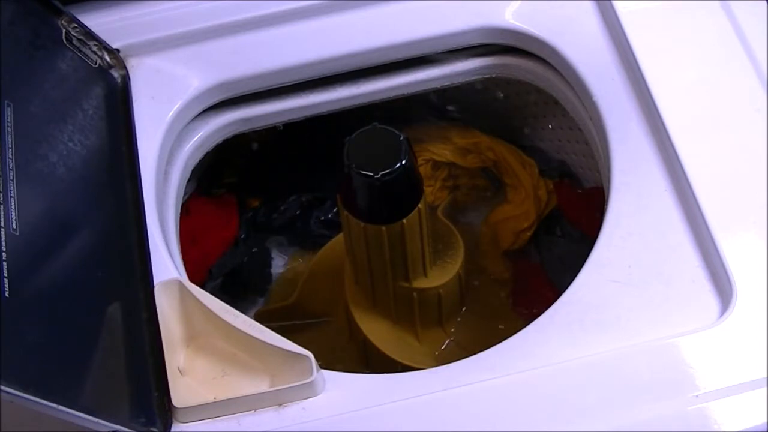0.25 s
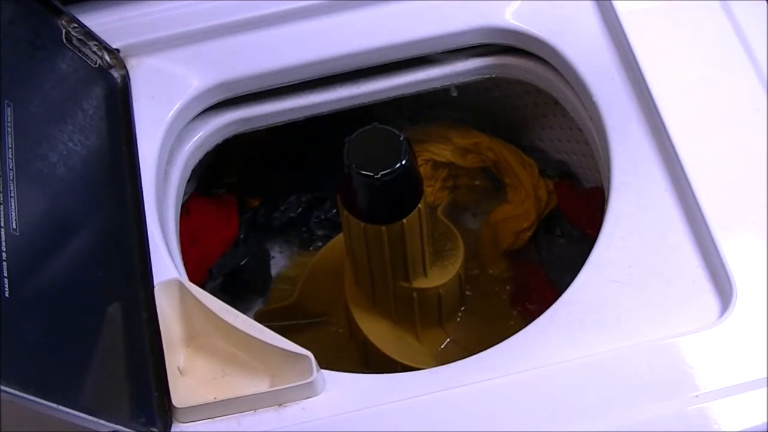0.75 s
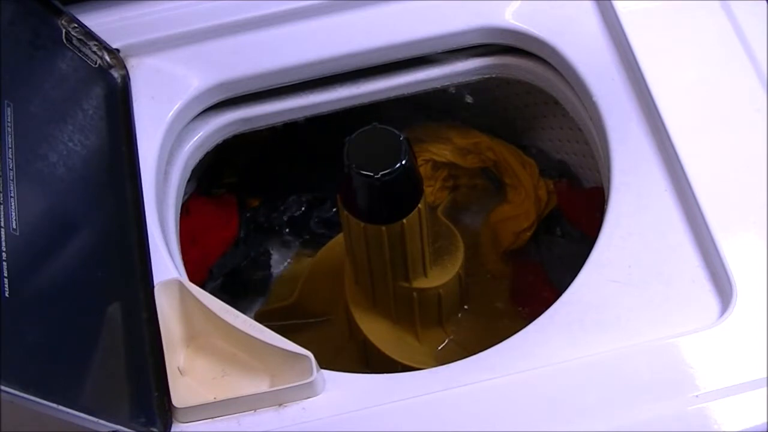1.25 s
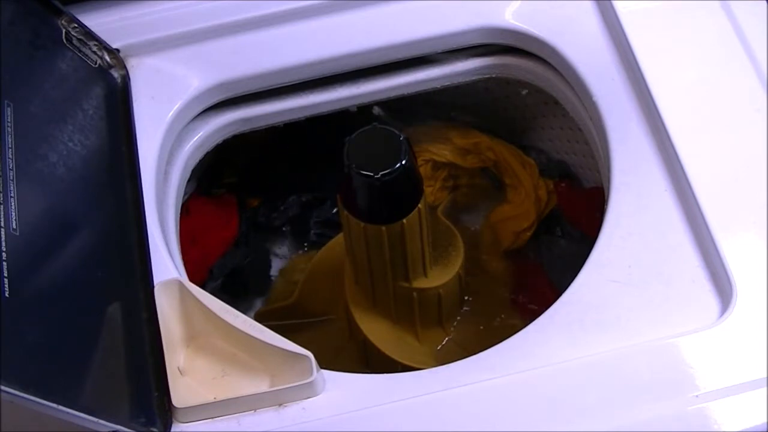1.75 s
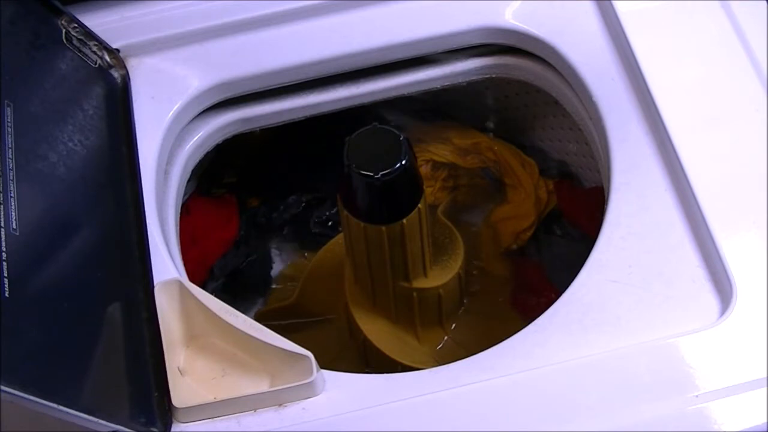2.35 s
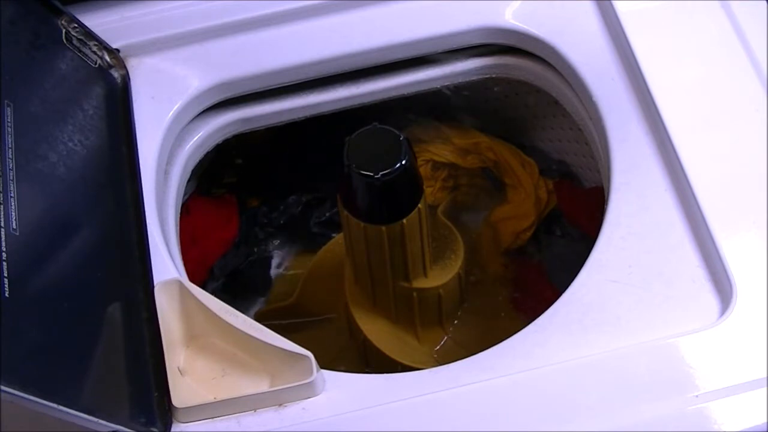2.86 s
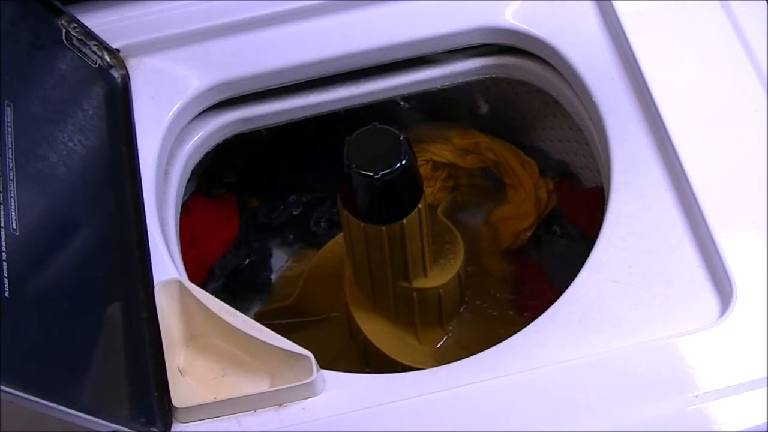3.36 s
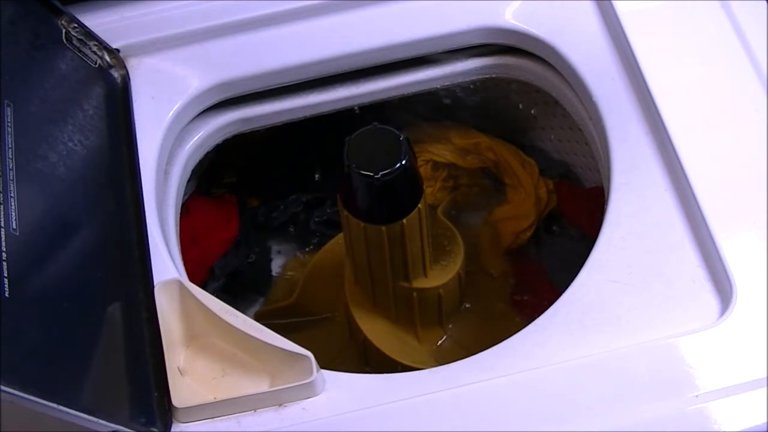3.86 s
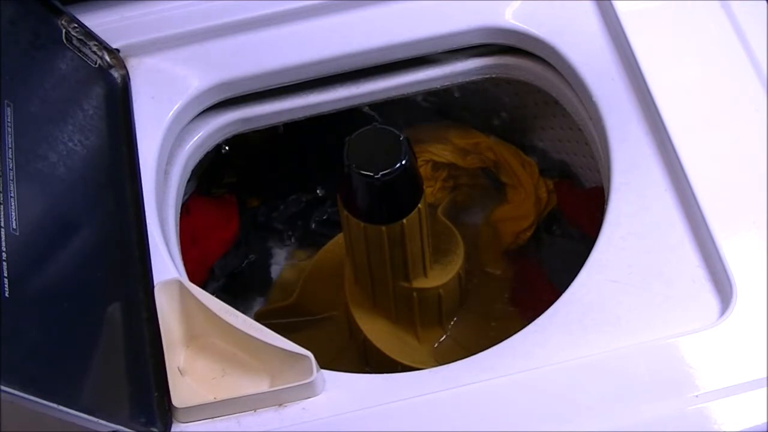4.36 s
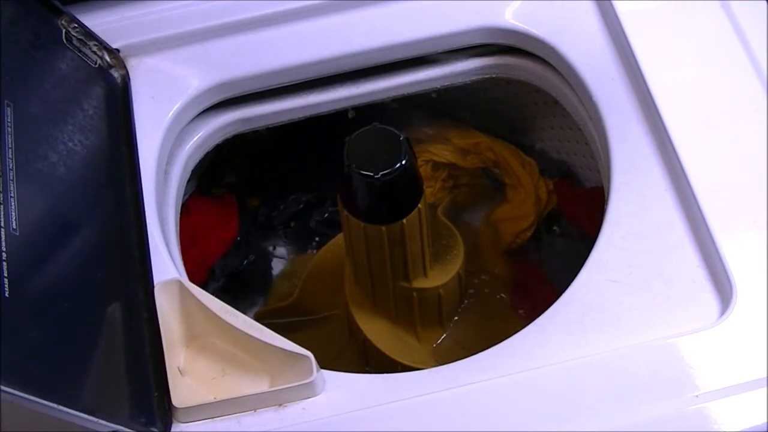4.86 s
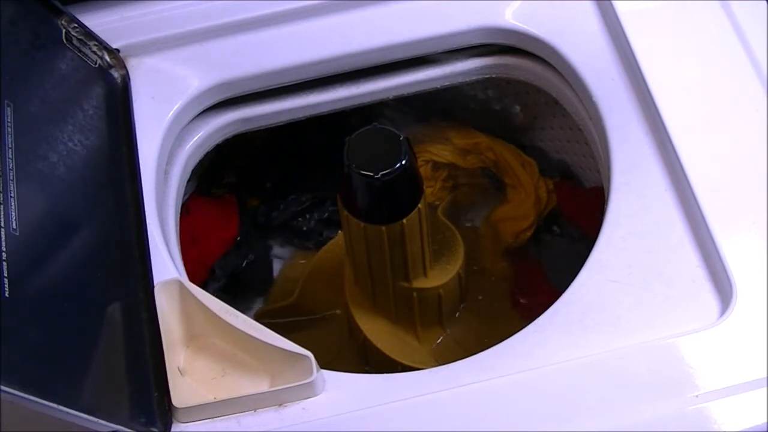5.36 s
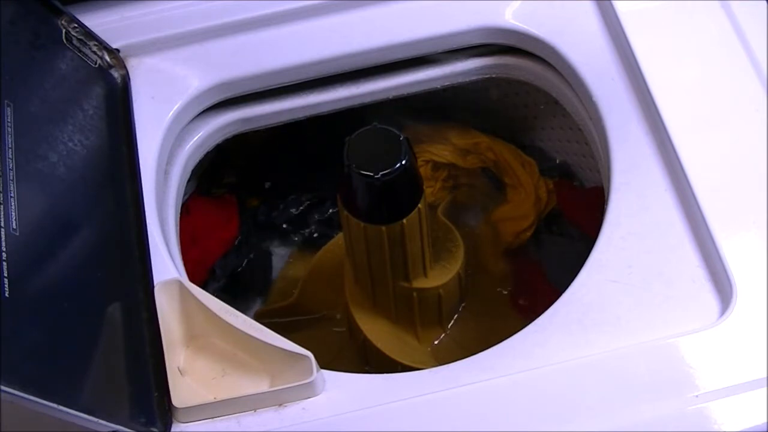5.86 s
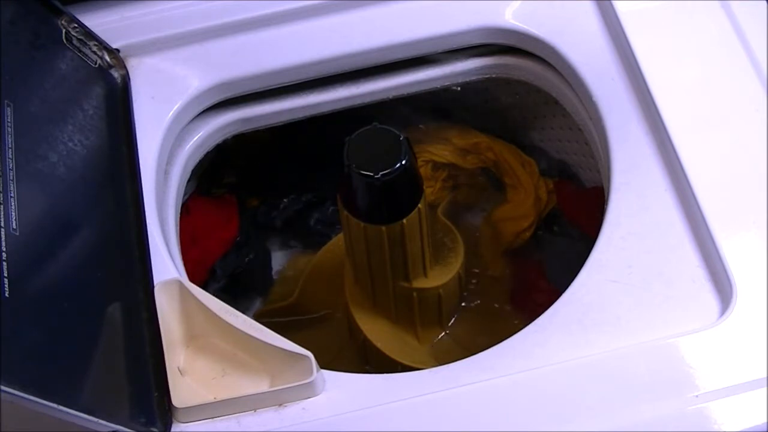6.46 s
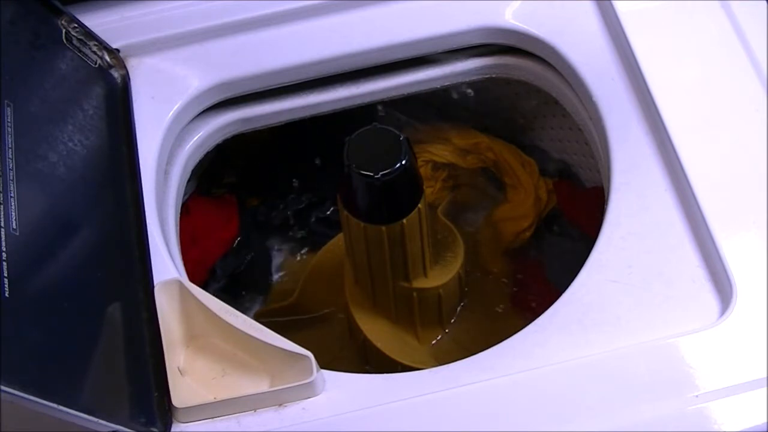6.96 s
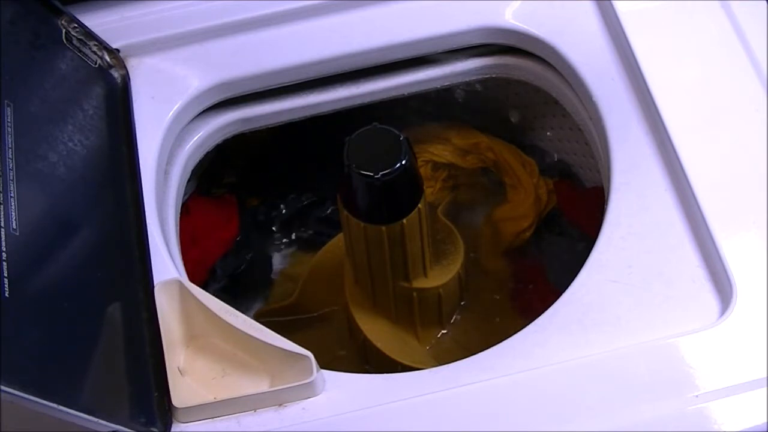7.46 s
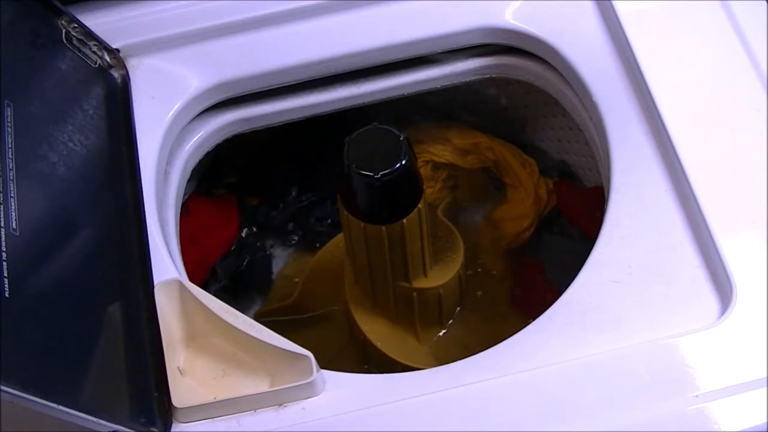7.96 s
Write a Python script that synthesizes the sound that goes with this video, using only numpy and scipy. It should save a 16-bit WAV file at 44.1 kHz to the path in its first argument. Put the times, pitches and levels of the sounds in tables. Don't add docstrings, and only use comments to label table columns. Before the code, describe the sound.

A strong jet of water drums on thin metal inside a washing machine basket, hissing and spattering on wet cloth, with one soft early bump.

```python
import sys
import numpy as np
from scipy import signal
from scipy.fft import rfft, irfft, next_fast_len
from scipy.io import wavfile
from scipy.ndimage import uniform_filter1d, map_coordinates

SR = 44100
rng = np.random.default_rng(int(sys.argv[2]) if len(sys.argv) > 2 else 0)


def inscribe(sig):
    pcm = np.round(np.clip(np.atleast_2d(sig).T, -1, 1) * 32767)
    wavfile.write(sys.argv[1], SR, pcm.astype(np.int16))


def volts(x):
    e = np.asarray(x, float) / 20
    return 10 ** e


N = 362502


def jet_roar():
    # freq_hz, level_db
    jet_spectrum = [(200, -56), (320, -18), (500, -3.5), (800, -4.5), (1150, 0.5), (1400, -2), (1760, -1),
                    (2100, 0), (2600, -3), (3150, -1), (3800, -6.5), (4300, -4), (6500, -43), (11000, -60)]
    roar = rng.standard_normal(N) * volts(0.7 * flutter([50])[0])
    return coloured(roar, jet_spectrum)


def basket_wall(x):
    # centre_hz, width_hz (its size alone counts), lift_db
    wall_modes = [(152, 23, 5.8), (183, 8, 9.0), (239, 26, 13.0), (403, 24, 5.3), (498, 15, 6.6),
                  (611, 18, -8.2), (655, 27, 5.0), (720, 6, 5.5), (755, 45, -5.4), (786, 15, 6.5),
                  (858, 17, 4.6), (1018, 137, 4.7), (1271, 16, 5.9), (1429, 9, 7.1), (1486, 40, 7.3),
                  (1637, 39, 4.6), (1778, 72, -5.0), (2084, 57, 3.8), (2418, 36, 3.6), (2582, 90, 6.4),
                  (2829, 8, 5.6), (2868, 86, 5.7), (3157, 38, -4.9), (3239, 25, 1.7), (3372, 9, 7.0),
                  (3630, 24, 5.3), (3683, 16, 4.1), (3940, 10, 9.2), (3990, 10, 3.3)]
    return ringing(x, wall_modes)


def steel_tones(flow_db):
    # centre_hz, width_hz
    tones = [(1009, 34), (1476, 22), (1894, 12), (2345, 11)]
    # time_s, tone_hz, lift_db, length_s
    swells = [(.1, 2345, 7, 0.087), (.64, 1476, -5, 0.22), (1.03, 1009, 4, .06), (7.5, 2345, -7, 0.68),
              (1.653, 1009, 7, 0.027), (1.74, 1476, -9, 0.089), (1.74, 2345, 2, 0.11),
              (.74, 1009, -7, 0.045), (2.2, 1476, 3.5, 0.36), (3.015, 2345, 10, 0.087),
              (3.16, 1476, -14, .1), (3.37, 1476, 4, 0.086), (3.41, 2345, 2, 0.091),
              (3.658, 1009, 5, 0.099), (3.948, 1476, 8, 0.15), (3.97, 2345, 9.5, 0.073),
              (4.34, 1009, 3, 0.14), (4.35, 1894, 5, 0.11), (4.45, 1476, -1, .2), (5.26, 1009, 4.5, 0.086),
              (5.28, 1476, 7, 0.1), (5.54, 2345, 3.5, .2), (5.79, 1009, 2, 0.091), (6.2, 1476, 5, 0.23),
              (6.71, 1476, 5, .1), (6.706, 1894, 10, 0.082), (6.704, 2345, 12, .05),
              (7.51, 1476, -10, 0.095), (7.627, 1009, -9, 0.067), (7.7, 1476, 12, 0.055)]
    usual_db, flicker_db = [-43.5, -48, -53.5, -47.5], 2
    out, clock = np.zeros(N), np.arange(N) / SR
    tones_hz = np.transpose(tones)[0]
    for k, (centre, width) in enumerate(tones):
        def resonance(f):
            damping = 1j * f * width
            return (damping / (centre * centre - f * f + damping)) ** 2

        tone = filtered(rng.standard_normal(N), resonance)
        swing = np.sqrt(np.abs(uniform_filter1d(tone ** 2, size=900))) + 1e-9
        evened = unit(tone / np.sqrt(swing))
        lift_db = np.zeros(N)
        for s, hz, db, length in swells:
            if np.abs(tones_hz - hz).argmin() == k:
                lift_db += db * np.exp(-((clock - s) / length) ** 2)
        out += volts(usual_db[k] + flow_db + lift_db + flicker_db * wobble(14)) * evened
    return out


def spray_and_mist():
    # freq_hz, level_db
    heavy_spectrum = [(1500, -28), (3000, -10.5), (3900, 2), (4500, 3.5), (5500, 0.5), (6800, -4),
                      (8000, -3), (16000, -45)]
    fine_spectrum = [(3500, -34.5), (5000, -14), (6000, -5), (7000, -3.5), (8500, 2.5), (9700, -2.5),
                     (10500, -6.5), (12000, -10.5), (16000, -32)]
    mist_spectrum = [(6000, -46), (9000, 2), (10500, 1), (12000, 2), (13500, -4.5), (15000, -6),
                     (16000, -26)]
    quick = flutter(rng.uniform(60, 90, 4))
    shared_db = 0.27 * quick[0] + 1.29 * wobble(170) + 0.55 * wobble(9) + 0.4 * wobble(5)

    def patter():
        many = drops(per_s=2000, spread_db=5)
        few = drops(per_s=430, spread_db=1)
        return rng.standard_normal(N) + 0.64 * many + 0.41 * few

    low = coloured(volts(shared_db + 0.52 * quick[1]) * patter(), heavy_spectrum)
    high = coloured(volts(shared_db + 0.81 * quick[2]) * patter(), fine_spectrum)
    mist = patter() * volts(0.41 * shared_db + 1.7 * quick[3])
    return volts(-5) * low + high, coloured(mist, mist_spectrum)


def splats():
    # time_s, peak_db, centre_hz
    heavy_clumps = [(0.267, -18, 5690), (0.3944, -18, 5680), (0.4303, -20, 5790), (0.526, -16.5, 6770),
                    (0.8011, -18.5, 5800), (1.1697, -16, 5900), (1.3895, -15, 4230), (1.4551, -17, 4940),
                    (1.8856, -14, 5670), (1.9844, -14.5, 4930), (2.0364, -13, 5900), (2.192, -14.5, 5850),
                    (2.3019, -15, 5130), (2.443, -15, 4900), (2.4922, -13, 6800), (2.965, -15, 5200),
                    (3.31, -13, 4920), (3.675, -17, 5100), (4.21, -20, 5800), (4.5316, -15, 5160),
                    (5.068, -17, 5080), (5.5568, -15.5, 5000), (6.266, -15.5, 5000), (6.445, -15.5, 5120),
                    (6.7072, -17, 5060), (6.878, -15, 5230), (7.3372, -14, 5120), (7.4245, -17, 5140),
                    (7.4842, -14, 5230), (8.1763, -15.5, 5150)]
    # time_s, peak_db, centre_hz
    loud_ticks = [(0.5252, -12.5, 9030), (0.9358, -16, 9450), (1.261, -14, 7420), (1.3932, -12, 8700),
                  (1.55, -14, 9010), (1.6282, -14, 7660), (1.6631, -11, 8800), (1.72, -12.5, 7440),
                  (1.8991, -14, 8800), (1.9904, -15, 7470), (2.041, -12.5, 7360), (2.5202, -11, 7420),
                  (2.818, -16, 7630), (3.5688, -15, 7630), (3.6716, -18, 7850), (3.8786, -13, 9380),
                  (4.4363, -14, 8580), (4.7701, -17, 7730), (4.9117, -15, 7490), (5.3353, -14, 8200),
                  (5.5194, -9.5, 7850), (6.4378, -12, 8290), (6.567, -10.5, 9170), (6.7441, -20, 9950),
                  (6.7655, -16, 9120), (7.0633, -16, 8160), (7.3028, -10, 8310), (7.5597, -13, 8250),
                  (7.8805, -13, 8150), (8.1978, -12, 8250)]
    small_clumps = scattered(count=90, db=-21.5, hz=5450, spread_db=2.5, spread_hz=880)
    small_ticks = scattered(count=160, db=-21.5, hz=8600, spread_db=7.5, spread_hz=590)
    snaps = scattered(count=300, db=-23, hz=5050, spread_db=9, spread_hz=850)
    clumps = bursts(heavy_clumps + small_clumps, rise=0.0017, fall=0.01, snap=4.4,
                    narrow_hz=500, broad_hz=2680, broad_db=5.5)
    ticks = bursts(loud_ticks + small_ticks, rise=0.00037, fall=0.0057, snap=8.3,
                   narrow_hz=1200, broad_hz=2400, broad_db=3)
    crackle = bursts(snaps, rise=0.0003, fall=0.0029, snap=5.5,
                     narrow_hz=900, broad_hz=3050, broad_db=0)
    return volts(-5) * clumps + volts(-3.5) * ticks + volts(-5) * crackle


def tub_hollow(x, view):
    # centre_hz, width_hz, lift_db from each of three viewpoints
    cavity_modes = [(4160.0, 70.0, 5.0, 5.0, 6.0), (4600.0, 290.0, 4.0, 5.0, 4.5),
                    (5020.0, 90.0, 6.0, 5.0, 2.0), (5140.0, 110.0, 5.0, 6.0, 8.5),
                    (5440.0, 90.0, 4.5, 4.5, 4.5), (5790.0, 140.0, 9.5, 9.0, -0.0),
                    (5900.0, 330.0, 0.0, -2.5, 4.0), (6400.0, 330.0, 3.5, 4.0, 3.5),
                    (6650.0, 320.0, 2.5, 2.5, 3.0), (6910.0, 60.0, 4.0, 4.5, 5.0),
                    (7150.0, 60.0, 3.5, 2.5, 4.0), (7390.0, 200.0, 7.5, 7.0, 6.0),
                    (7630.0, 90.0, 5.5, 5.5, 1.5), (7910.0, 190.0, 2.0, 4.5, 4.5),
                    (8150.0, 90.0, 0.0, 3.5, 3.5), (8330.0, 140.0, -0.5, -2.0, 4.0),
                    (8600.0, 140.0, 3.0, 3.0, -1.0), (8760.0, 70.0, 2.5, 3.0, 1.0),
                    (8980.0, 190.0, 4.0, 1.0, -1.5), (9150.0, 100.0, -1.0, 2.0, 6.0),
                    (9390.0, 100.0, 5.5, 6.5, 4.0), (9940.0, 290.0, 1.0, 1.5, 3.5),
                    (10820.0, 330.0, 2.5, 3.0, 1.5), (11320.0, 140.0, 2.5, 2.5, 1.5)]
    heard = np.zeros(N)
    for k in range(3):
        modes = [(centre, width, lifts[k]) for centre, width, *lifts in cavity_modes]
        share = np.clip(1 - np.abs(view - k), 0, 1)
        heard += share * ringing(x, modes)
    t = np.arange(SR // 8) / SR
    tail = rng.standard_normal(len(t)) * volts(-60 * t / 0.12) * (t > 0.002)
    echo = signal.fftconvolve(heard, tail / np.linalg.norm(tail))[:N]
    return heard + volts(-15) * echo


def camera_bump():
    # time_s, level_db, pitch_hz, t60_s
    knocks = [
        (.7, -35, 150, 0.096),
        (.7, -46, 246, .12),
        (.7, -50, 90, 0.2),
    ]
    out = np.zeros(N)
    for s, db, hz, t60 in knocks:
        t = np.maximum(np.arange(N) / SR - s, 0)
        onset = (1 - np.exp(-t / 0.008)) ** 2
        out += volts(db - 60 * t / t60) * onset * np.sin(2 * np.pi * hz * t)
    return out


def room_hum():
    # freq_hz, level_db
    hum_spectrum = [(25, -30), (60, -13), (100, -11.5), (130, -4), (200, -8), (320, 0.5), (450, 1),
                    (900, -35)]
    return coloured(rng.standard_normal(N), hum_spectrum)


def bursts(events, rise, fall, snap, narrow_hz, broad_hz, broad_db):
    s, db, hz = np.transpose(events)
    t = np.arange(2048) / SR
    envelope = (1 - np.exp(-t / rise)) * np.exp(-t / fall)
    grit = rng.standard_normal((len(s), len(t))) * envelope
    grit[:, 0] += snap
    off_hz = np.fft.rfftfreq(2 * len(t), 1 / SR) - hz[:, None]
    band = np.exp(-(off_hz / narrow_hz) ** 2) + volts(broad_db) * np.exp(-(off_hz / broad_hz) ** 2)
    body = np.roll(irfft(rfft(grit, 2 * len(t)) * band), len(t) // 2, axis=1)
    body = body * (volts(db) / np.abs(body).max(axis=1))[:, None]
    at = np.round(s * SR).astype(int)[:, None] + np.arange(2 * len(t))
    return np.bincount(at.ravel(), body.ravel(), N + SR)[len(t) // 2:][:N]


def scattered(count, db, hz, spread_db, spread_hz):
    when, size, pitch = rng.uniform(-0.9, 1, (count, 3)).T
    s = (np.arange(count) + 0.5 + when / 2) / count * N / SR
    return list(zip(s, db + spread_db * size, hz + spread_hz * pitch))


def drops(per_s, spread_db):
    hit, size = rng.random(N), rng.standard_normal(N)
    strength = volts(spread_db * np.minimum(np.abs(size), 2.5))
    return unit((hit < per_s / SR) * strength * np.sign(size))


def wobble(rate):
    knots = rng.standard_normal(int(N * rate / SR) + 4)
    return map_coordinates(knots, [np.arange(N) * rate / SR])


def flutter(rates):
    fast = np.array([wobble(rate) for rate in rates])
    return fast - uniform_filter1d(fast, size=SR // 20, axis=1)


def ringing(x, modes):
    def response(f):
        out = np.ones(len(f), complex)
        for centre, width, db in modes:
            damping = 1j * f * abs(width)
            out = out * (1 + (volts(db) - 1) * damping / (centre * centre - f * f + damping))
        return out

    return filtered(x, response)


def coloured(x, points):
    f, db = np.transpose(points)
    return unit(filtered(x, lambda hz: volts(np.interp(np.log(hz + 1), np.log(f + 1), db))))


def filtered(x, response):
    m = next_fast_len(N + SR // 2)
    return irfft(rfft(x, m) * response(np.fft.rfftfreq(m, 1 / SR)), m)[:N]


def unit(x):
    return x / np.sqrt(np.mean(x ** 2) + 1e-20)


def scene():
    # time_s, level_db over full flow
    flow = [(0, -2), (.46, -2.5), (1.08, -2.5), (1.75, -0.5), (2.43, 0.1), (3.66, -0.34), (4.26, -0.25),
            (5.59, 0.07), (6.3, -0.1), (7.03, 0), (7.7, -0.4), (8.22, -0.5)]
    # time_s, viewpoint (0-2, no unit)
    drift = [
        (0, 0.29),
        (3.1, 0.2),
        (3.9, 0.46),
        (4.9, 1.2),
        (5.5, 1.8),
        (8.22, 2.4),
    ]
    clock = np.arange(N) / SR
    flow_db = np.interp(clock, *np.transpose(flow))
    view = np.clip(np.interp(clock, *np.transpose(drift)), 0, 2)
    jet_db = 0.79 * flow_db
    spray_db = -34.5 + 1.5 * flow_db
    mist_db = -39 + 0.88 * flow_db
    fine, mist = spray_and_mist()
    splash = volts(spray_db) * fine + volts(mist_db) * mist + volts(-0.5) * splats()
    wall = basket_wall(volts(-37 + jet_db) * jet_roar() + volts(-58.5) * room_hum())
    mono = wall + steel_tones(jet_db) + tub_hollow(splash, view) + camera_bump()
    return np.array([mono, mono])


def low_pass(x):
    return signal.sosfilt(signal.butter(12, 15710, fs=SR, output="sos"), x)


def record(dry):
    thin = filtered(dry[0], lambda f: (1j * f / (1j * f + 75)) ** 4)
    return low_pass(np.array([thin, thin]))


dry = scene()
out = record(dry)
inscribe(out)
```